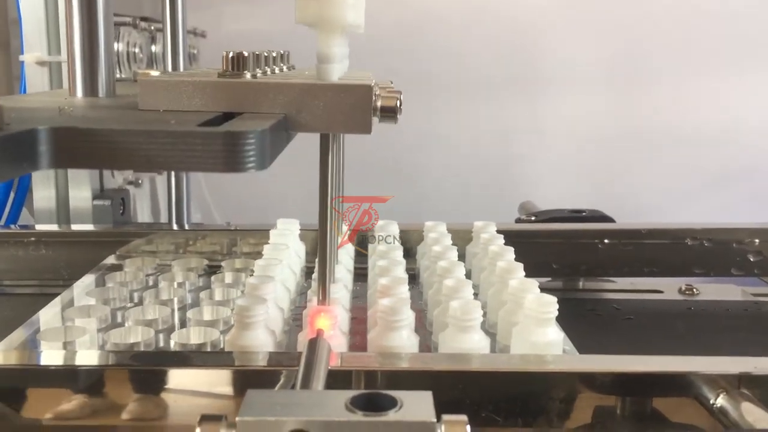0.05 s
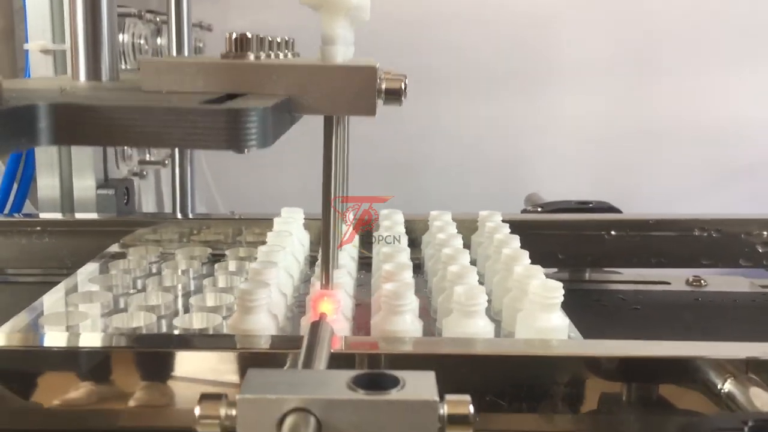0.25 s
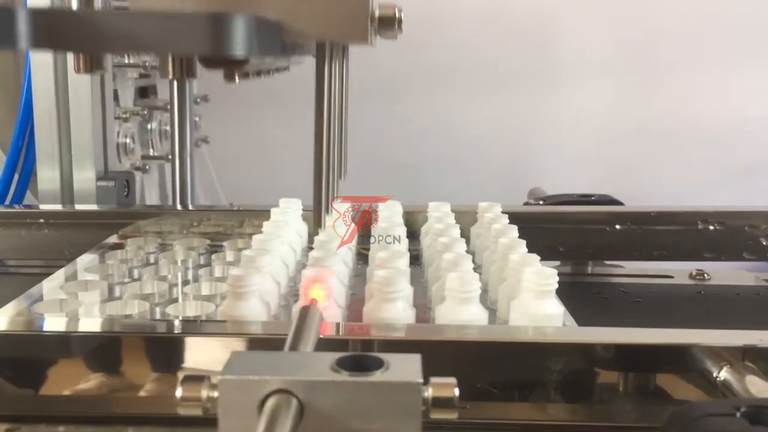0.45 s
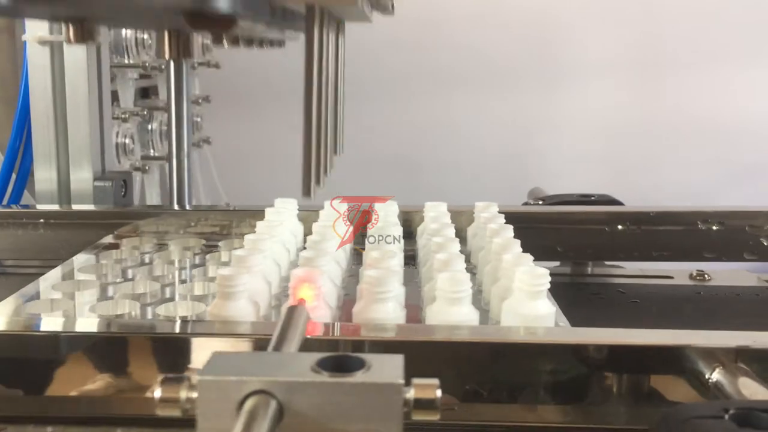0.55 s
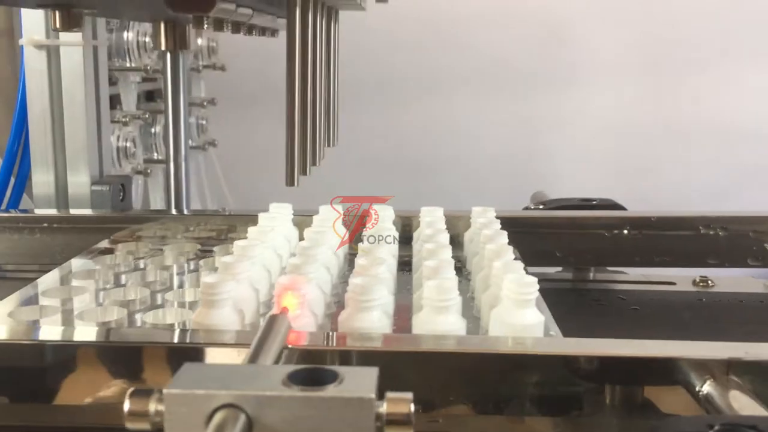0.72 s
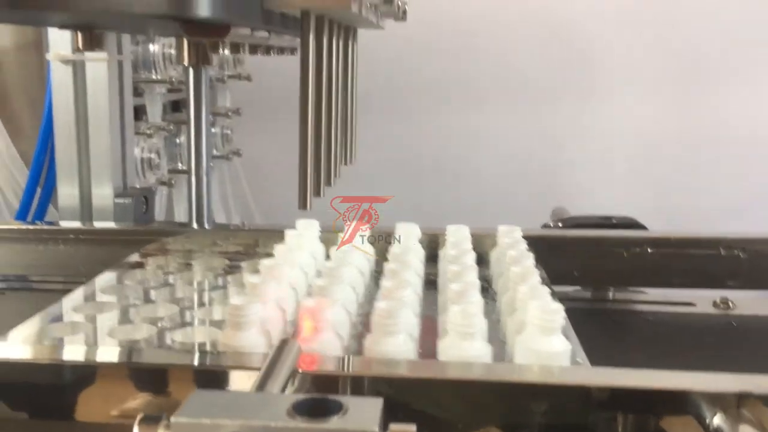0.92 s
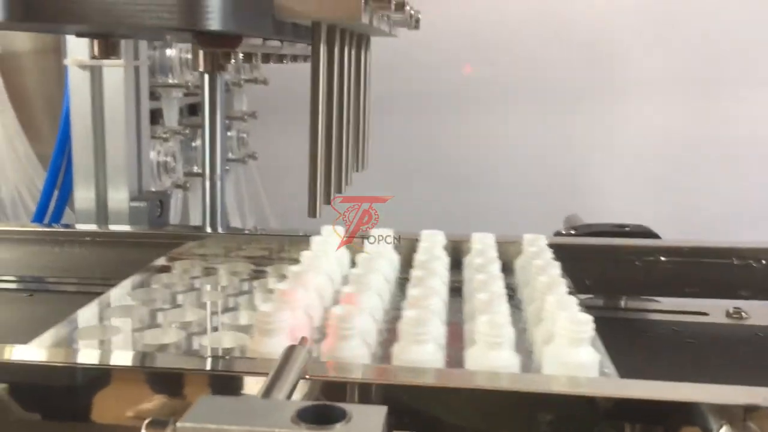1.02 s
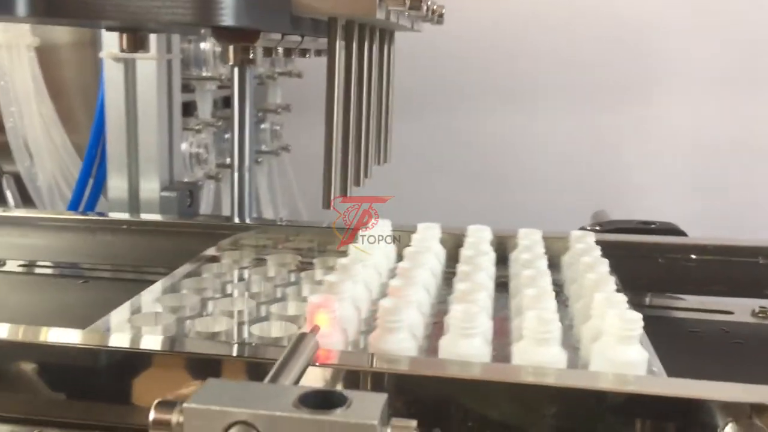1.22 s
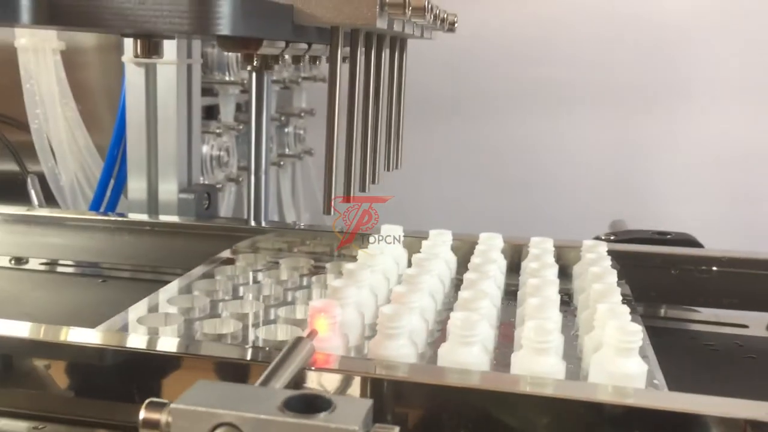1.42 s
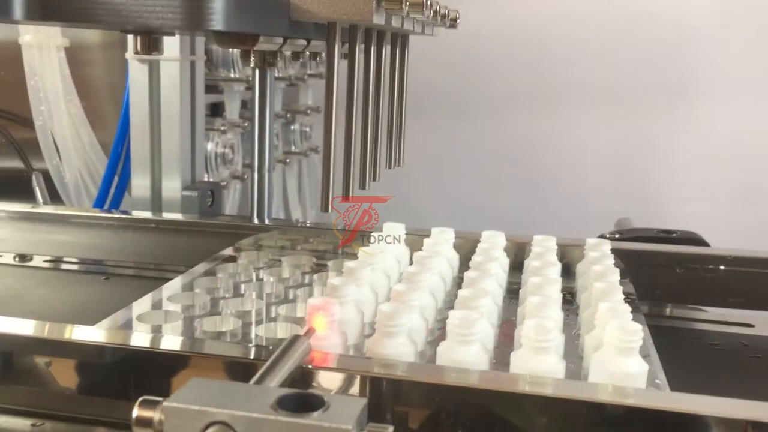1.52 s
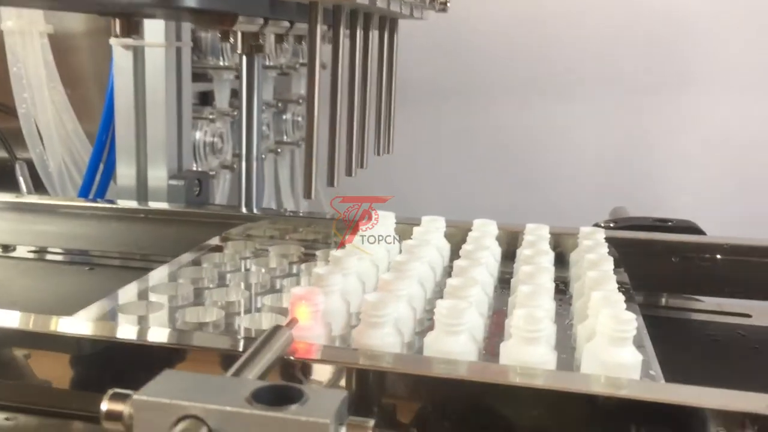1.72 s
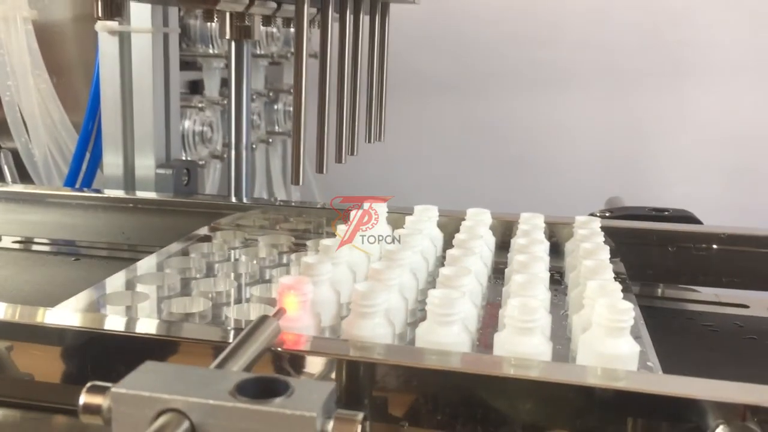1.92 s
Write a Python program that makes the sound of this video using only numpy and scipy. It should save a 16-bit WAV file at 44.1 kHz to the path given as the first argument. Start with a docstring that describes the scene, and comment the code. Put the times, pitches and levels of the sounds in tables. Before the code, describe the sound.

Pneumatic filler: liquid rushing, a sharp metallic clack, a short rising air hiss, dull thud, low machine hum

```python
"""A bottle filler in a workshop, over a steady hum of machines made of noise with tonal resonances.
Liquid runs as coloured noise and spits in short bursts; an air valve clacks, ringing its panel, and vents.
The cylinder lifts the nozzle head with a brightening hiss and a whistle, shaking the frame's low modes.
It thuds into its end stop and the nozzle plate rings on. Then small ticks, soft low bumps of the
carrier and a faint leak of air remain. Close echoes and a diffuse room tail surround the sounds."""
import sys
import numpy as np
from scipy import signal
from scipy.fft import rfft, irfft, next_fast_len
from scipy.io import wavfile

SR = 44100
rng = np.random.default_rng(int(sys.argv[2]) if len(sys.argv) > 2 else 0)


def dump_mix(stems):
    """Bounce the given channels to the path in sys.argv[1] as a 16-bit WAV at rate SR."""
    frames = np.atleast_2d(stems).T  # one column per channel
    limited = np.clip(frames, -1, 1)  # hard clip at full scale
    pcm = np.round(limited * 32767).astype(np.int16)
    wavfile.write(sys.argv[1], SR, pcm)


N = 85995
T = np.arange(N) / SR
HZ = np.fft.rfftfreq(N, 1 / SR)
STOP_S = .643  # the head reaches its end stop


def amp(db):
    """Decibels to gain."""
    return np.exp(np.asarray(db) * np.log(10) / 20)


def unit(x):
    """Scales to rms 1."""
    return x / np.sqrt(np.mean(x ** 2) + 1e-20)


def read(points, hz):
    """Reads a spectrum on a log-frequency axis."""
    f, value = np.transpose(points)
    return np.interp(np.log(hz + 1), np.log(f + 1), value)


def level(points):
    """Gain over time from points of seconds and dB."""
    return amp(np.interp(T, *np.transpose(points)))


def noise(gain):
    """Random-phase noise of rms 1 with the given gain per frequency."""
    phase = 2 * np.pi * rng.random(len(HZ))
    return unit(irfft(gain * np.exp(1j * phase), N))


def colour(spectrum, peaks=()):
    """Gain per frequency of a broad spectrum with resonances or dips on it."""
    db_at = read(spectrum, HZ)
    for hz, width, db in peaks:
        db_at = db_at + db / (1 + (2 * (HZ - hz) / width) ** 2)
    return amp(db_at)


def wander(rate_hz):
    """Slow random drift: straight lines between random knots of rms about 1."""
    knots = np.arange(64) / (2 * rate_hz)
    return np.interp(T, knots, rng.standard_normal(len(knots)))


def envelope(start, rise, hold, fall_db_per_s):
    """Linear attack, then an exponential release that begins hold seconds after the start."""
    attack = np.clip((T - start) / rise, 0, 1)
    return attack * amp(-fall_db_per_s * np.maximum(T - start - hold, 0))


def decay(t60, rise):
    """Envelope of a blow: linear rise on an exponential decay, about two t60 long."""
    t = T[:next_fast_len(int(2 * t60 * SR))]
    return np.minimum(t / rise, 1) * np.exp(-np.log(1000) * t / t60)


def add(mix, start, sound):
    """Mixes a sound in at a time."""
    part = mix[round(start * SR):][:len(sound)]
    part += sound[:len(part)]


def ring(start, modes, rise=.0002):
    """Dying sines of a struck body."""
    out = np.zeros(N)
    for hz, db, t60 in modes:
        shape = decay(t60, rise)
        sine = np.sin(2 * np.pi * hz * T[:len(shape)])
        add(out, start, amp(db) * shape * sine)
    return out


def burst(start, db, t60, rise, gain_at):
    """A dying puff of noise, coloured by the function gain_at(hz)."""
    out, shape = np.zeros(N), decay(t60, rise)
    white = rng.standard_normal(SR // 2)[:len(shape)]
    puff = irfft(rfft(white) * gain_at(np.fft.rfftfreq(len(white), 1 / SR)), len(white))
    add(out, start, amp(db) * shape[:len(white)] * unit(puff))
    return out


def hum():
    """Steady machine noise with broad tones; its level drifts by about 1 dB."""
    # Broad background. Each row: frequency in Hz, density in dB per Hz.
    background = [(20,-36.5),(35,-18),(60,-5),(90,-9),(135,-2),(180,-7.5),(300,1),(400,-9),(560,-8),(700,-7),(1080,-12),(1400,-23.5),(2500,-24),(3500,-33),(5500,-36.5),(7500,-42),(9000,-39),(10500,-44.5),(16000,-43.5)]
    # Tones in the hum. Each row: frequency in Hz, width in Hz, height above the background in dB.
    tones = [(62, 8, 4), (145, 15, 5), (278.5, 30, 3.5), (345, 14, 3), (655, 18, 4), (715, 18, 6),
             (1055, 22, 8), (2320, 25, 6)]
    return amp(-52) * noise(colour(background, tones)) * amp(wander(5))


def filling():
    """Liquid rushes into the bottles as steady resonant noise, then fades at a constant rate."""
    # Rush of the liquid. Each row: frequency in Hz, density in dB per Hz.
    rush = [(25,-38.5),(60,-14),(150,-9),(200,-14),(330,-6.5),(480,-2),(900,-3),(1350,-3.5),(1650,-12),(3000,-14),(3550,-20),(4200,-13),(5800,-25),(6400,-21),(8000,-25),(9800,-25),(10400,-37),(11200,-30),(13000,-25),(16000,-31.5)]
    # Its resonances and a dip. Each row: frequency in Hz, width in Hz, height in dB.
    resonances = [(375, 30, -8), (458, 43, 7), (782, 100, 3.4), (1340, 70, 5), (2080, 50, 6), (3180, 35, 9),
                  (12000, 25, 12)]
    level_db, end_s, fade_db_per_s = -36.5, 0.33, 65.5
    fade = amp(level_db - fade_db_per_s * np.maximum(T - end_s, 0))
    return fade * noise(colour(rush, resonances))


def ticks():
    """Spits, small ticks and knocks: short noise bursts, each in one broad resonance."""
    # Each row: start in seconds, level in dB, pitch in Hz, width in Hz, t60 in seconds.
    events = [(0.0488, -38, 9600, 3980, .035), (.049, -39, 4400, 3500, .05), (.1208, -32, 5800, 5000, .035),
              (.1212, -38, 9900, 2010, .03), (.1703, -33, 4500, 3500, .045), (.1707, -34, 8000, 1800, .025),
              (.343, -26, 310, 120, .08), (.733, -58, 14600, 4000, .18), (.922, -50, 3500, 900, .09),
              (.925, -58, 6000, 9000, .07), (1.056, -56, 5400, 3980, 0.047),
              (1.144, -54, 4650, 4000, 0.074), (1.15, -57, 14000, 4500, .12), (1.152, -47, 760, 600, .26),
              (1.272, -61, 5620, 800, .04), (1.3214, -67, 14000, 4000, .03), (1.487, -69, 14000, 4000, .03),
              (1.5029, -62, 5400, 795, 0.025), (1.54, -58, 1780, 150.2, 0.058),
              (1.568, -42.5, 280, 200.6, .1), (1.933, -62, 5300, 900, 0.034)]
    out = np.zeros(N)
    for start, db, hz, width, t60 in events:
        resonance = lambda f: 1 / (1 + ((f ** 2 - hz ** 2) / (width * (f + 1))) ** 2)
        out += burst(start, db, t60, .0015, resonance)
    return out


def valve():
    """The valve trips and slams over in pitched, noisy blows; the hardest sets the panel ringing."""
    # Blows. Each row: start in seconds, level in dB, ring pitch in Hz, ring t60 in seconds,
    # knock level against the ring in dB (before the knock is halved).
    clacks = [(.2424, -15, 2600, .013, -4), (.2451, -12, 2950, .009, -2), (.2523, -.5, 980, .012, -3),
              (.2527, -4, 1850, .018, -20), (.2538, -5, 2780, .015, -7)]
    # Colour of the knocks. Each row: frequency in Hz, density in dB per Hz.
    knock_colour = [(40, -6), (80, 4), (200, -8), (560, -9), (800, -1), (1200, 1), (1650, -1), (2900, 1),
                    (3700, -14), (4300, -9), (6000, -18), (9000, -15), (16000, -20)]
    # Modes of valve block and panel. Each row: frequency in Hz, relative level in dB, t60 in seconds.
    panel = [(76, -25, .12), (262, -35, .5), (340, -26, .32), (362, -29, .42), (445, -34, .35),
             (524, -28, .2), (838, -20, .12), (1029, -23, .11), (1080, -26, .15), (1217, -18, .115),
             (1534, -26, .1), (1880, -27, .1), (1944, -27, .1), (2255, -26, .15), (2660, -21, .1),
             (2837, -23, .11)]
    knock_t60_s, panel_db = .022, 1
    out = np.zeros(N)
    for start, db, hz, t60, knock_db in clacks:
        out += ring(start, [(hz, db, t60)])
        knock = burst(start, db + knock_db, knock_t60_s, .0003, lambda f: amp(read(knock_colour, f)))
        out += knock / 2
    hardest = max(clacks, key=lambda row: row[1])
    return out + amp(panel_db) * ring(hardest[0], panel)


def frame():
    """The moving head shakes the frame's low modes with wavering phase; the end stop strikes them."""
    # Low modes. Each row: frequency in Hz, relative level in dB, t60 in seconds when struck.
    modes = [(61.44, -8.5, .6), (82.4, 0, 0.48), (121, -11.5, 0.23), (165, -13, .2), (272.6, -6.5, 0.3),
             (357, -15.5, .25), (390, -5, 0.19)]
    # Shaking while the head moves and settles. Each row: time in seconds, level in dB.
    shake_curve = [(.238, -73), (.25, -26), (.29, -35), (.33, -46.5), (.42, -33), (.48, -36), (.54, -33.5),
                   (.61, -39.5), (.68, -52), (.87, -85)]
    tilt_db_per_octave, stop_db, stop_rise_s = -4, -22, .006
    shake = np.zeros(N)
    for hz, db, _ in modes:
        tilt_db = tilt_db_per_octave * np.log2(hz / modes[0][0])
        shake += amp(db + tilt_db) * np.sin(2 * np.pi * hz * T + .6 * wander(12))
    return level(shake_curve) * unit(shake) + amp(stop_db) * ring(STOP_S, modes, stop_rise_s)


def vent():
    """Compressed air bursts from the exhaust port as resonant noise that soon drops away."""
    # Burst of air. Each row: frequency in Hz, density in dB per Hz.
    blast = [(60,-10),(150,-7),(350,-2),(600,-9),(1200,-5),(1750,-8),(2700,-7),(3700,-13),(4300,-9),(5600,-16),(6700,-13),(7700,-14),(9000,-9),(10500,-12),(12000,-10),(15500,-10.5)]
    # Resonances of the port. Each row: frequency in Hz, width in Hz, height in dB.
    resonances = [(3190, 60, 7), (4190, 120, 7), (6444, 70, 12), (6861, 70, 8), (8756, 60, 9),
                  (9351, 150, 5), (11980, 80, 7), (13810, 120, 5), (14396, 80, 6)]
    shape = envelope(.2528, rise=.0044, hold=.011, fall_db_per_s=749.5)
    return amp(-12) * shape * noise(colour(blast, resonances))


def cylinder():
    """Throttled air hisses; its treble brightens and a whistle grows towards the end of the stroke."""
    # Hiss. Each row: frequency in Hz, density in dB per Hz.
    hiss = [(100,-17.5),(300,-8),(500,-11),(1200,-8),(1800,-8.5),(3300,-10.5),(3800,-9),(4500,-7.5),(7100,-14),(8300,-24),(9500,-24),(10400,-30),(11600,-26),(15500,-25)]
    # Its resonances and a dip. Each row: frequency in Hz, width in Hz, height in dB.
    resonances = [(1320, 60, 5), (1900, 60, 4), (2170, 50, 4.3), (2926, 80, 3), (3360, 70, 5),
                  (3760, 70, -7), (4050, 40, 5), (4238, 50, 5), (4500, 150, 3), (5130, 48, 5),
                  (5630, 35, 6), (7080, 120, 4)]
    # Course of the lift. Each row: time in seconds, level in dB.
    lift_curve = [(.24, -90), (.26, -50), (.3, -32), (.37, -33.5), (.44, -34.5), (.5, -32), (.57, -33.5),
                  (.632, -30.5), (.665, -45), (.7, -55), (.88, -100)]
    split_hz, brighten_db_per_s = 2000, 11
    whistle_hz, whistle_width_hz = 4560, 40
    whistle_db, whistle_grow_db_per_s = -9, 50  # level against the hiss at the stop
    air = noise(colour(hiss, resonances))
    treble = irfft(rfft(air) / (1 + (split_hz / (HZ + 1)) ** 4), N)
    to_stop = np.minimum(T - STOP_S, 0)  # negative seconds until the stop, then zero
    whistle = noise(1 / (1 + ((HZ - whistle_hz) / whistle_width_hz) ** 2))
    whistle *= amp(whistle_db + whistle_grow_db_per_s * to_stop)
    brightened = air - treble + amp(brighten_db_per_s * to_stop) * treble
    return level(lift_curve) * (brightened + whistle)


def slide():
    """The slide and the bottle carrier rumble as low noise whose level rises and falls."""
    # Rumble. Each row: frequency in Hz, density in dB per Hz.
    rumble = [(30, -27), (65, -4), (140, 0), (250, 0), (400, -2), (490, -9), (640, -8), (850, -16),
              (1250, -15), (1700, -26.5), (5000, -41), (15000, -62.5)]
    # Its course. Each row: time in seconds, level in dB.
    rumble_curve = [(.24, -65), (.29, -34), (.4, -40.5), (.5, -41), (.6, -47), (.7, -38), (.87, -49.5),
                    (.98, -45.5), (1.1, -52), (1.19, -47.5), (1.4, -58.5), (1.68, -71), (1.8, -53.5),
                    (1.95, -53)]
    return level(rumble_curve) * noise(colour(rumble))


def end_stop():
    """Dull noise thuds at the top of the stroke; the nozzle plate rings on."""
    # Cushion, then stop. Each row: start in seconds, level in dB, t60 in seconds, treble edge in Hz.
    thuds = [(.635, -27, .085, 2400), (.646, -27, .08, 330)]
    # Modes of the nozzle plate. Each row: frequency in Hz, level in dB, t60 in seconds.
    plate = [(668, -40, .22), (735, -45, .35), (1132, -45, .45), (1200, -41, .45), (1252, -41, .5),
             (1270, -43, .5), (1650, -38, .2), (3450, -37, .13)]
    out = ring(thuds[0][0], plate, rise=.003)
    for start, db, t60, edge_hz in thuds:
        out += burst(start, db, t60, .004, lambda f: f / (f + 60) / (1 + (f / edge_hz) ** 3))
    return out


def leak():
    """A little air escapes as faint noise that swells, holds and fades."""
    # Escaping air. Each row: frequency in Hz, density in dB per Hz.
    air = [(200, -20), (1500, 1), (3500, 1.5), (6200, -1), (7500, -5), (10500, -8), (13000, -5),
           (16000, -13)]
    shape = envelope(.867, rise=.064, hold=.3, fall_db_per_s=121)
    return amp(-67) * shape * noise(colour(air))


def carrier():
    """The sliding carrier bumps softly: slow-rising, dying sines near the frame's lowest mode."""
    # Each row: start in seconds, level in dB, rise in seconds, t60 in seconds.
    bumps = [(.93, -46, .02, .4), (1.14, -50, .02, .3), (1.3, -46, .03, .4), (1.74, -51, .02, .25),
             (1.83, -41, .07, .9)]
    bump_hz = 62.5
    return sum(ring(start, [(bump_hz, db, t60)], rise) for start, db, rise, t60 in bumps)


def echoes(x):
    """Reflections off nearby steel sheets comb the sound; the sum is scaled to about equal power."""
    # Each row: delay in seconds, level in dB.
    reflections = [(.0031, -13), (.0058, -12), (.0093, -13), (.0137, -15), (.0171, -16)]
    out, power = x.copy(), 1
    for delay, db in reflections:
        out += amp(db) * np.pad(x, (int(delay * SR), 0))[:N]
        power += amp(db) ** 2
    return out / np.sqrt(power)


def room(x):
    """A diffuse tail of noise, each band dying at its own speed."""
    # Dying time of the workshop. Each row: frequency in Hz, t60 in seconds.
    t60_points = [(60, .5), (300, 0.23), (1200, 0.94), (3000, 0.52), (5500, 0.8), (8000, 0.33),
                  (12000, 0.54), (16000, 0.1)]
    # Strength of the tail. Each row: frequency in Hz, level in dB.
    strength = [(60, -16), (300, -6), (600, -10), (1000, -14), (3000, -13), (5500, -10), (9000, -14),
                (16000, -15)]
    hz, t, bands = signal.stft(rng.standard_normal(SR), SR, nperseg=256)
    t60 = read(t60_points, hz)[:, None]
    bands = bands * np.exp(-np.log(1000) * t / t60)
    bands *= np.sqrt(2 * np.log(1000) / (t60 * SR))  # equal energy for short and long decays
    bands *= amp(read(strength, hz))[:, None]
    tail = signal.istft(bands, SR)[1][:SR]
    tail = tail * np.clip(T[:SR] / 0.006, 0, 1)  # soft onset
    return signal.fftconvolve(x, tail)[:N]


def scene():
    """Mixes the layers; the room tail follows the valve, vent, cylinder, end stop and ticks."""
    near = valve() + vent() + echoes(cylinder() + end_stop() + ticks())
    body = frame() + slide() + carrier()
    flow = echoes(filling() + leak())
    return (near + room(near) + body + flow + hum())[None]


def record(dry):
    """The microphone's bass cut, soft overload of loud peaks, then the band limit."""
    mic_low_hz, ceiling, edge_hz = 36, 1.15, 15880
    bass_cut = signal.butter(2, mic_low_hz, "high", fs=SR, output="sos")
    thinned = signal.sosfilt(bass_cut, dry)
    squeezed = ceiling * np.tanh(thinned / ceiling)
    band_limit = signal.firwin(511, edge_hz, window=("kaiser", 9), fs=SR)
    return signal.oaconvolve(squeezed, band_limit[None], "same")


dry = scene()
out = record(dry)
dump_mix(out)
```